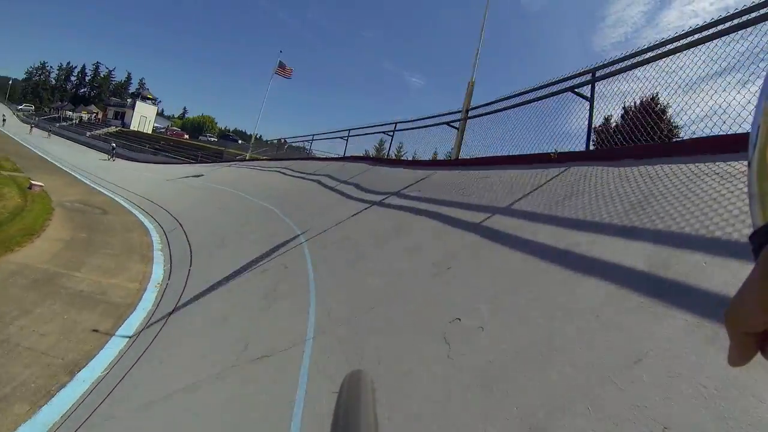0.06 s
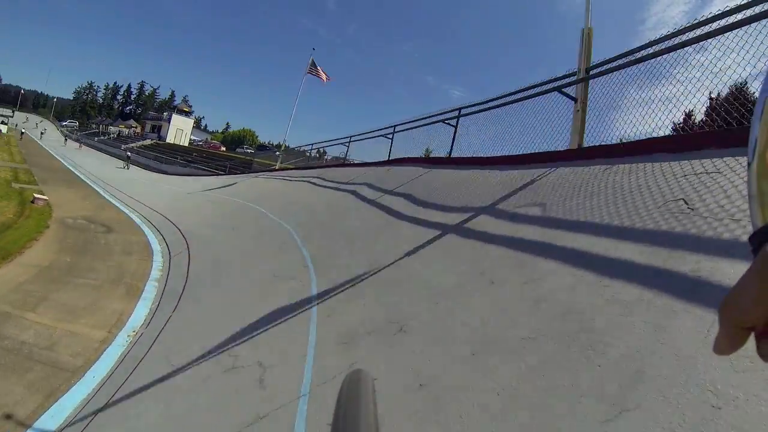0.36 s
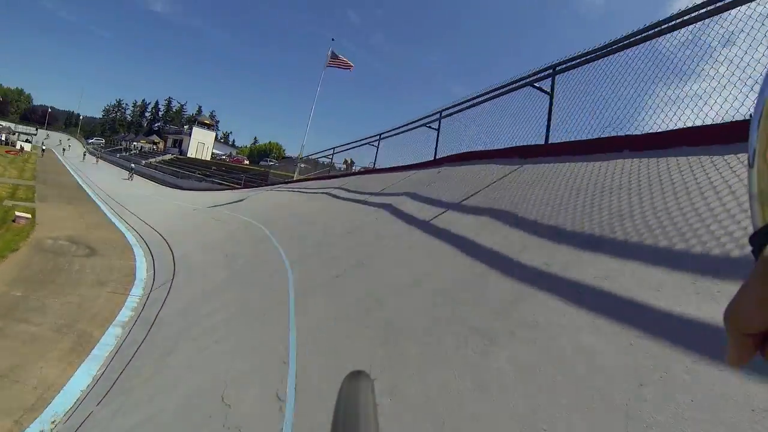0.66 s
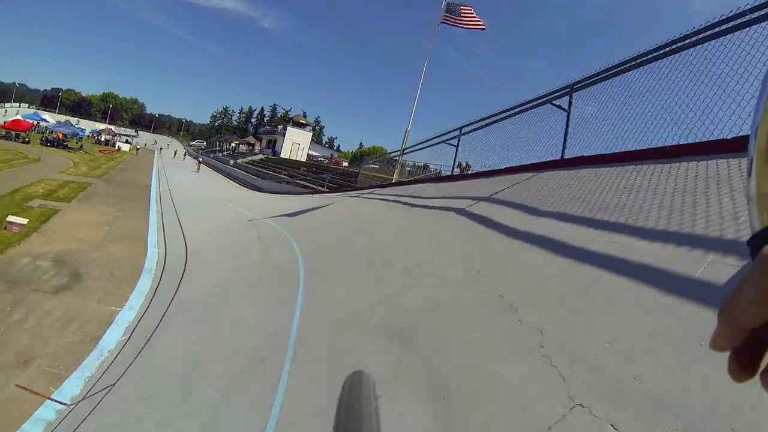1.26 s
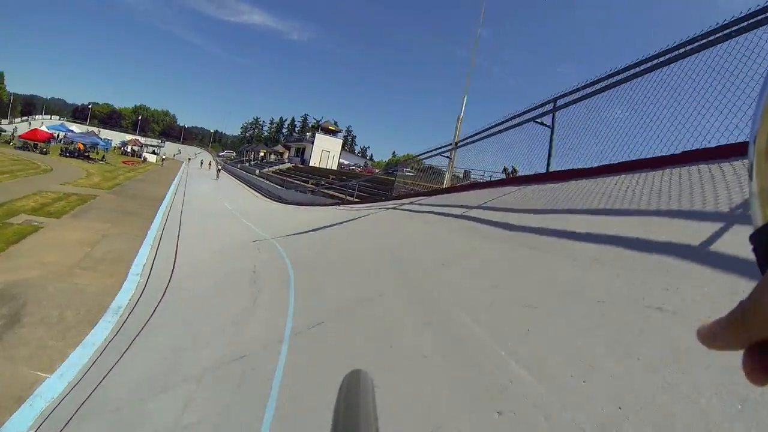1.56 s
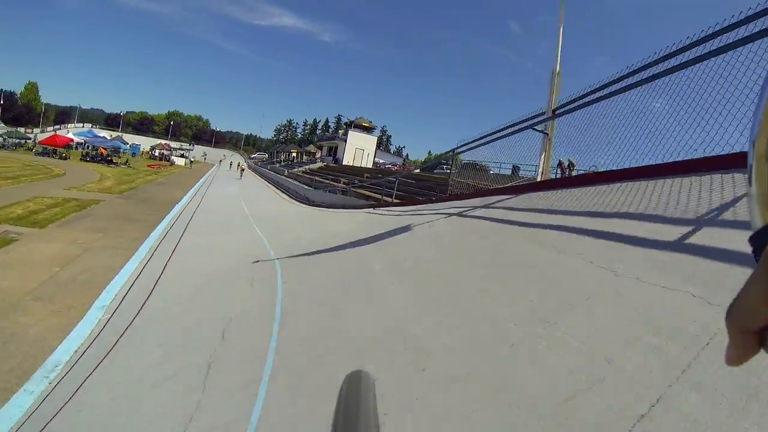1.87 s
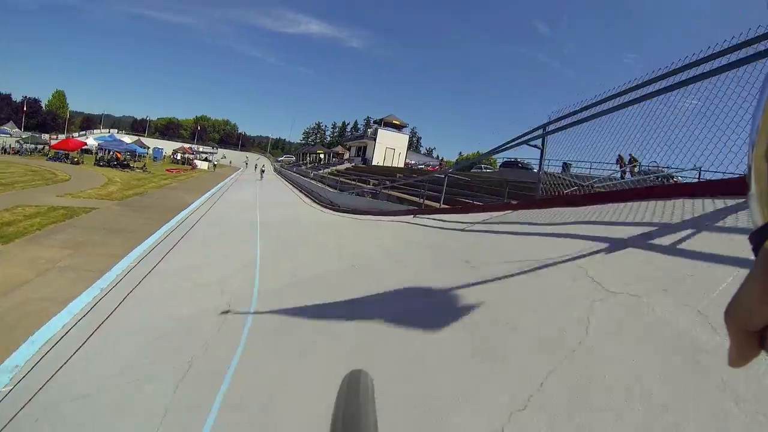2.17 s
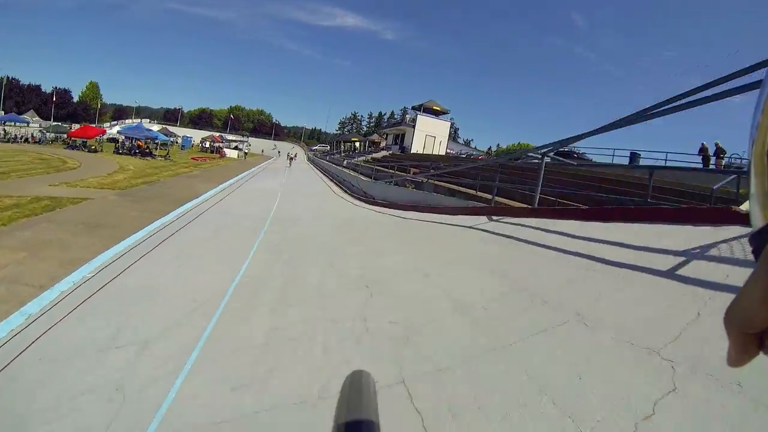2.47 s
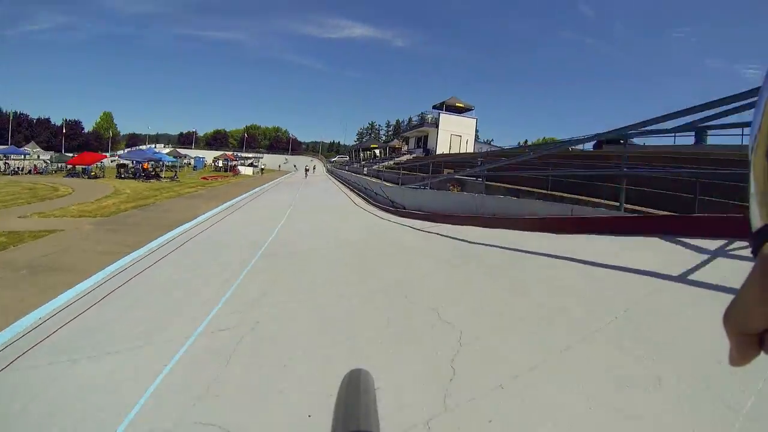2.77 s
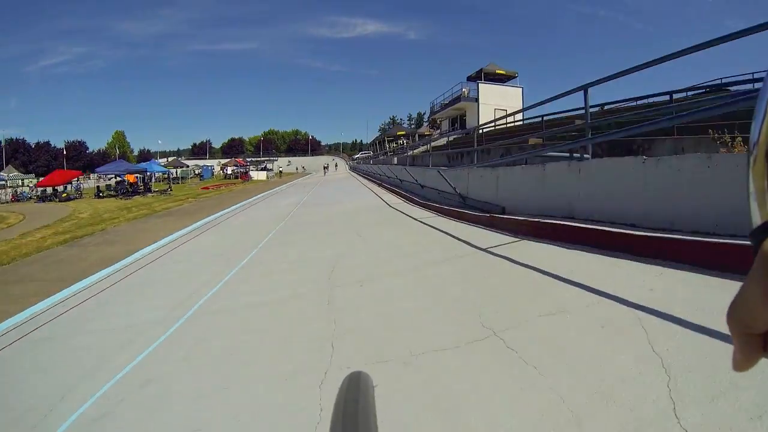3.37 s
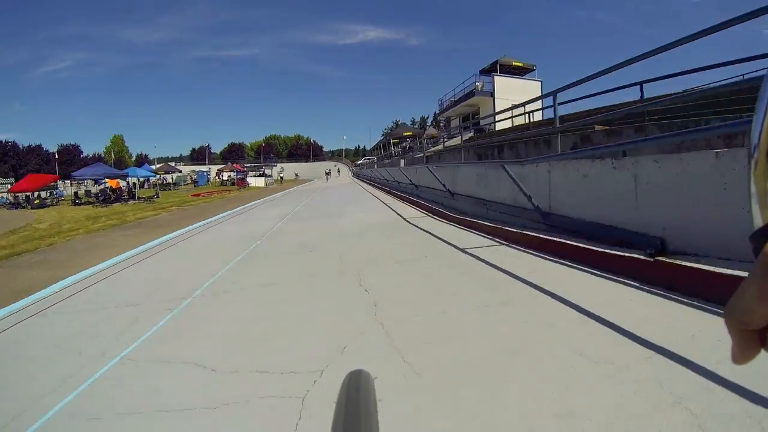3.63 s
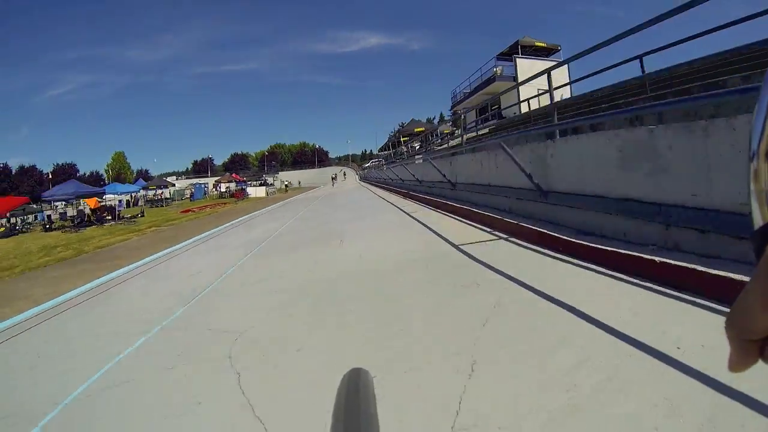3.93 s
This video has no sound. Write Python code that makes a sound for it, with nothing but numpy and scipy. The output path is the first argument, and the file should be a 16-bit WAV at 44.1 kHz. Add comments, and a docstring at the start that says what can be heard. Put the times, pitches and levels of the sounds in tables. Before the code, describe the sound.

A bicycle rolls fast around an outdoor concrete track, heard from a microphone on its frame. It rumbles and drones under gusting air and tyre rush, with thumps and a faint chain purr. Sharp knocks come near the end.

```python
"""A bicycle rolling fast round a concrete track, heard close up from a camera fixed to its frame.
From the start the frame shakes and drones on the rough surface, and air and tyre rush swell through
the hooting camera case. Bumps thump through the mount, which chatters at the crest of each shake.
From halfway the purring chain quickens into the straight. In the last second or so the drone
and rush sit lower, and a run of sharp knocks comes from the bike."""
import sys
import numpy as np
from scipy import signal
from scipy.fft import rfft, irfft
from scipy.io import wavfile
from scipy.ndimage import uniform_filter1d

SR = 44100
rng = np.random.default_rng(int(sys.argv[2]) if len(sys.argv) > 2 else 0)


def store_wav(level_fs):
    """Save 16-bit WAV to argv[1]."""
    pcm = np.round(np.clip(np.atleast_2d(level_fs), -1, 1) * 32767)
    wavfile.write(sys.argv[1], SR, pcm.T.astype(np.int16))


N = 176400
T = np.arange(N) / SR
HZ = np.fft.rfftfreq(N, 1 / SR)

# Rush of air and tyres at the microphone: time_s, level_db
RUSH_LEVEL = [(.02, -46), (.05, -40), (.25, -40.5), (.33, -36), (.36, -42), (.445, -39), (.465, -49),
              (.65, -40), (.69, -46), (.78, -36), (.9, -38.5), (.93, -48.5), (1.12, -53), (1.25, -39),
              (1.29, -45), (1.36, -41.5), (1.54, -38.5), (1.83, -44), (1.98, -37), (2.03, -40), (2.15, -36),
              (2.28, -34.5), (2.365, -37), (2.39, -45), (2.5, -40), (3.05, -51), (3.19, -48.5),
              (3.28, -42.5), (3.42, -50), (3.58, -42.5), (3.8, -50.5), (3.86, -44.5), (3.96, -48)]
# Bumps in the track: time_s, relative_db
BUMPS = [(0.161, -17), (0.168, -7), (0.349, -8), (0.452, -8), (.663, -6), (0.907, -3), (0.918, -14),
         (1.024, -8), (1.097, -13.5), (1.265, -7.5), (1.678, -11), (1.761, -6.5), (2.001, -11),
         (2.149, -10), (2.368, -7.5), (2.53, -8), (2.701, -6.5), (2.876, -12.5), (2.989, -7.5),
         (3.302, -6.5), (3.414, -9), (3.492, -15), (3.591, -7.5), (3.744, -5), (3.867, -12.5),
         (3.921, -17.5)]


def frame_shake():
    """Road and wind shake the frame in two modes; each bump takes over with one hard, pointed swing."""
    # Strength of the two modes: time_s, sway_relative_db, shudder_relative_db
    mode_levels = [(0, -43, -9), (0.449, -9.5, -26.5), (.75, -21.5, -14), (1.081, -9.5, -23.5),
                   (1.211, -20.5, -24), (1.301, -16, -15.5), (1.85, -15, -16.5), (2.101, -18.5, -17),
                   (2.399, -14.5, -19), (2.75, -21, -12), (3.1, -11.5, -21.5), (3.35, -21.5, -14.5),
                   (3.599, -13.5, -23), (4, -19.5, -7)]
    # Spectra of the slow sway and the quicker shudder: frequency_hz, gain_db
    sway_spectrum = [(10, -40), (22, -22), (30, -3), (36, 3), (43, -8), (55, -20), (100, -42), (1500, -140)]
    shudder_spectrum = [(25, -35), (48, -11), (62, 3), (72, -14), (84, -27), (112, -26), (132, -20),
                        (170, -26), (250, -32), (330, -41), (500, -54), (3000, -140)]
    swing_s, tip_s, tip_share = .0035, .0012, .36
    times, sway_db, shudder_db = np.transpose(mode_levels)
    shake = np.zeros(N)
    for spectrum, db in ((sway_spectrum, sway_db), (shudder_spectrum, shudder_db)):
        mode = gain_control(noise(slope(spectrum)), evenness=.8)
        shake += amp(np.interp(T, times, db) - 3.5) * mode
    for time_s, db in BUMPS:
        u = (T - time_s) / swing_s
        swing = (1 - u ** 2 / 2) / (1 + u ** 2 / 2) * np.exp(-(u / 4.8) ** 2)
        tip = 1 / (1 + ((T - time_s) / tip_s) ** 2)
        shake *= 1 - np.exp(-(u / 2.64) ** 2)  # the shaking gives way to the bump
        shake += amp(db + 1.5) * ((1 - tip_share) * swing + tip_share * tip)
    return shake


def frame_drone():
    """Tyre vibration rings the frame, and now and then builds up to a short, clear surge."""
    # Strength of the ringing: time_s, level_db
    drone_level = [(.02, -30), (.1, -23), (.32, -23.5), (.47, -31), (.8, -29), (1.05, -39), (1.3, -30.5),
                   (2.7, -30), (2.88, -40)]
    # Response of the frame: frequency_hz, gain_db
    spectrum = [(20, -48), (80, -26.5), (132, -8), (170, -15.5), (202, -0.5), (226, 4.5), (240, -5),
                (254, -19), (300, -35), (420, -38), (800, -104)]
    # Surges on a single pitch: time_s, peak_db
    surges = [(.145, -18), (.645, -23), (.772, -18.5), (.895, -15.5), (1.357, -20), (1.54, -23),
              (1.752, -20), (1.895, -21.5), (2.265, -21), (2.68, -22), (3.585, -23)]
    surge_s = .015
    drone = level(drone_level) * gain_control(noise(slope(spectrum)), evenness=.43)
    for time_s, peak_db in surges:
        swell = bell(T - time_s, surge_s)
        pitch_hz = rng.normal(224, 8)
        tone = np.sin(2 * np.pi * pitch_hz * T)
        drone = drone * np.sqrt(1 - swell ** 2) + amp(peak_db) * swell * tone
    return drone


def air_and_tyre_rush():
    """Fluttering noise of air and tyres reaches the microphone through the camera case."""
    # The rush ahead of the case resonances: frequency_hz, gain_db
    spectrum = [(150, -13.5), (350, -12), (490, -5.5), (620, -18), (860, -16), (1100, -5), (1300, -2.5),
                (1800, -1), (2080, -7.5), (2650, -7), (3250, -20), (4300, -29.5), (6000, -40), (9000, -54),
                (15000, -75)]
    flow = rng.standard_normal(N) * wander(depth_db=2.6, rate_hz=70)
    return level(RUSH_LEVEL) * unit(colour(flow, slope(spectrum) + case_db()))


def knocks():
    """Each knock is a dry click that rattles the mount and a short thud in the frame."""
    # Sharp knocks from the bike: start_s, click_db, thud_db
    hits = [(0.0348, -30, -20), (1.1448, -35, -21), (2.8335, -24, -17), (3.0844, -27, -18),
            (3.1138, -30, -21), (3.1443, -30, -21), (3.3418, -23, -14), (3.91, -30, -22),
            (3.9799, -21.5, -18)]
    # Colour of the click: frequency_hz, gain_db
    click_spectrum = [(200, 11), (700, 4), (1100, 1), (1650, 9), (2000, -4), (2550, 5), (3300, -14),
                      (3900, -9), (4600, -28), (9000, -35), (15000, -70)]
    click_fall_s, thud_fall_s, thud_hz = .0027, .011, 209
    strikes, thuds = np.zeros(N), np.zeros(N)
    for start_s, click_db, thud_db in hits:
        t = np.maximum(T - start_s, 0)
        strikes += amp(click_db) * (t > 0) * np.exp(-t / click_fall_s)
        thuds += amp(thud_db) * np.sin(2 * np.pi * thud_hz * t) * np.exp(-t / thud_fall_s)
    clicks = colour(strikes * rng.standard_normal(N), slope(click_spectrum))
    return thuds + np.std(strikes) * unit(clicks)


def case_hoot():
    """The case sounds on its own at a strong resonance, flaring and fading in gusts."""
    # Strength of the hoot ahead of the gusts: time_s, level_db
    hoot_level = [(0.02, -48), (0.14, -35), (.175, -47), (0.7, -51), (0.75, -38), (1.12, -62), (1.19, -47),
                  (2.19, -47), (2.26, -40), (2.97, -54), (3.96, -49)]
    # One narrow resonance: frequency_hz, gain_db
    spectrum = [(100, -63), (400, -41.5), (560, -8.5), (620, 20), (690, 4.5), (900, -46), (4000, -90)]
    return level(hoot_level) * unit(noise(slope(spectrum)) * wander(depth_db=2.5, rate_hz=9))


def mount_chatter(motion):
    """The mount rubs softly all the time, harder at the crests of the motion, and crunches on bumps."""
    # Colour of the rubbing: frequency_hz, gain_db
    spectrum = [(400, -11), (1500, 9.5), (2800, 7), (4200, -4), (6000, -10), (8800, -14), (10500, -22.5),
                (15500, -33.5)]
    rub_floor, crunch_s = .032, .0018
    crests = np.tanh(abs(unit(motion)) / 2) ** 3.8
    rub = amp(-51) * unit((rub_floor + crests) * level(RUSH_LEVEL))
    crunch = sum(amp(-33.5 + .7 * db) * bell(T - time_s, crunch_s) for time_s, db in BUMPS)
    friction = np.maximum(rub, crunch) * rng.standard_normal(N)
    return np.std(friction) * unit(colour(friction, slope(spectrum) + .68 * case_db()))


def chain():
    """Every link rolls onto the sprocket with a short metallic rasp that swells with the rush."""
    # Links meeting the sprocket: time_s, rate_hz
    link_rate = [(0, 68.2), (.8, 68.63), (1.1, 64.9), (2.1, 67), (2.45, 69.1), (3, 75.4), (4, 82)]
    # The chain before it swells with the rush: time_s, level_db
    chain_level = [(0, -57.5), (.8, -60), (1.05, -65), (1.9, -66), (2.7, -63.5), (4, -65)]
    # Ring of the metal: frequency_hz, gain_db
    spectrum = [(1000, -27), (2800, 1), (4200, -14), (4950, 3), (5600, -7), (6000, -24), (7400, -16.5),
                (8700, -7), (9700, -30), (15000, -67)]
    contact_s, spread_db = .002, 4.2
    rate_hz = np.interp(T, *np.transpose(link_rate))
    links = np.cumsum(rate_hz) / SR
    from_contact_s = (links % 1 - .5) / rate_hz
    link_gain = amp(spread_db * rng.standard_normal(N))[links.astype(int)]
    rasp = link_gain * bell(from_contact_s, contact_s) * rng.standard_normal(N)
    rasp *= level(RUSH_LEVEL) ** .62
    return level(chain_level) * unit(colour(rasp, slope(spectrum) + case_db()))


def mount_clinks():
    """Every bump makes the mount clink, each time at another pitch."""
    pitches_hz = rng.uniform(3300, 5200, len(BUMPS))
    clink_s = .001
    return sum(amp(db - 39) * bell(T - time_s, clink_s) * np.sin(2 * np.pi * hz * T)
               for (time_s, db), hz in zip(BUMPS, pitches_hz))


def mount_squeaks():
    """Twice the mount slips with a thin metallic chirp."""
    # Slips of the mount: time_s, peak_db
    slips = [(.425, -57), (1.34, -53)]
    pitch_hz, width_hz, squeak_s = 5480, 130, .006
    ring = noise(-20 * np.log10(1 + ((HZ - pitch_hz) / width_hz) ** 2))
    return ring * sum(amp(db) * bell(T - time_s, squeak_s) for time_s, db in slips)


def case_db():
    """The camera case around the microphone lifts some narrow bands and dips others."""
    # Peaks and dips of the case: centre_hz, half_width_hz, gain_db
    resonances = [(619, 48.3, 20), (766, 58.7, 22.5), (933, 15, 13.5), (1409, 14, 8.5), (1510, 40, 8.5),
                  (1960, 47, 6.5), (2191, 33, 8.5), (2360, 23, 6), (2964, 52, 5), (3630, 44, 8.5),
                  (4400, 71, -5), (4780, 210, 4), (5270, 89, -7), (5466, 95, 8)]
    return sum(db * bell(HZ - hz, width) for hz, width, db in resonances)


def gain_control(x, evenness, memory_s=.06):
    """Holds the low shake and drone at an even loudness, as the camera's gain control does."""
    power = uniform_filter1d(abs(signal.hilbert(x)) ** 2, int(memory_s * SR))
    return unit(x / (power + 1e-9) ** (evenness / 2))


def amp(db):
    """Decibels to gain."""
    return 10 ** (np.asarray(db) / 20)


def unit(x):
    """Scales to an rms of one."""
    return x / np.sqrt(np.mean(x ** 2) + 1e-20)


def bell(offset, width):
    """A Gaussian curve that peaks at one."""
    return np.exp(-.5 * (offset / width) ** 2)


def level(points):
    """A curve of decibels as a gain per sample."""
    return amp(np.interp(T, *np.transpose(points)))


def slope(points):
    """A spectrum in decibels, straight between points on a log-frequency axis."""
    hz, db = np.transpose(points)
    return np.interp(np.log(HZ + 1), np.log(hz), db)


def colour(x, db):
    """Minimum-phase filter with the given gain in decibels."""
    cepstrum = irfft(np.log(amp(db)), N)
    cepstrum[1:N // 2] *= 2
    cepstrum[N // 2 + 1:] = 0
    return irfft(rfft(x) * np.exp(rfft(cepstrum)), N)


def noise(db):
    """Noise of unit rms with the given spectrum."""
    return unit(irfft(rfft(rng.standard_normal(N)) * amp(db), N))


def wander(depth_db, rate_hz):
    """A gain that drifts at random, up to about the given rate."""
    return amp(depth_db * noise(-10 * np.log10(1 + (HZ / rate_hz) ** 4)))


def scene():
    """All that reaches the microphone on the frame, in mono."""
    motion = frame_shake() + frame_drone()
    mix = motion + air_and_tyre_rush() + case_hoot() + chain()
    mix += mount_chatter(motion) + mount_clinks() + mount_squeaks() + knocks()
    return mix[None]


def record(dry):
    """The camera cuts off the highest treble."""
    cutoff_hz = 15800
    lowpass = signal.firwin(511, cutoff_hz, window=("kaiser", 9), fs=SR)
    return signal.oaconvolve(dry, lowpass[None], "same")


dry = scene()
out = record(dry)
store_wav(out)
```